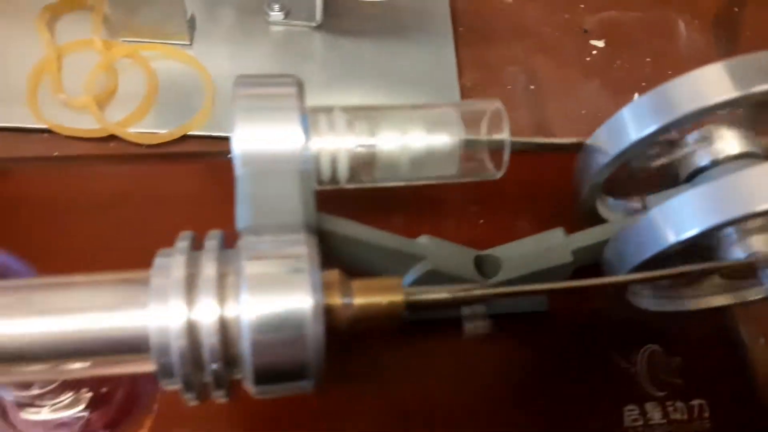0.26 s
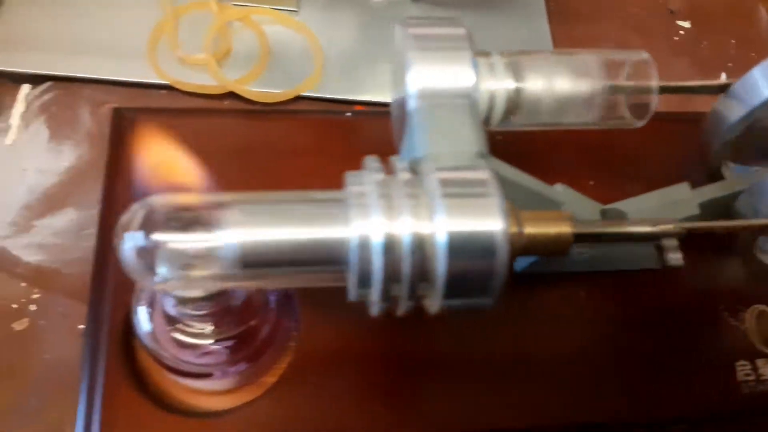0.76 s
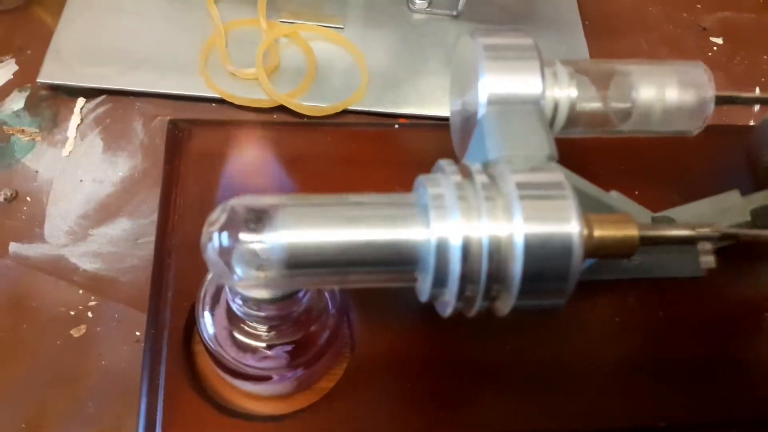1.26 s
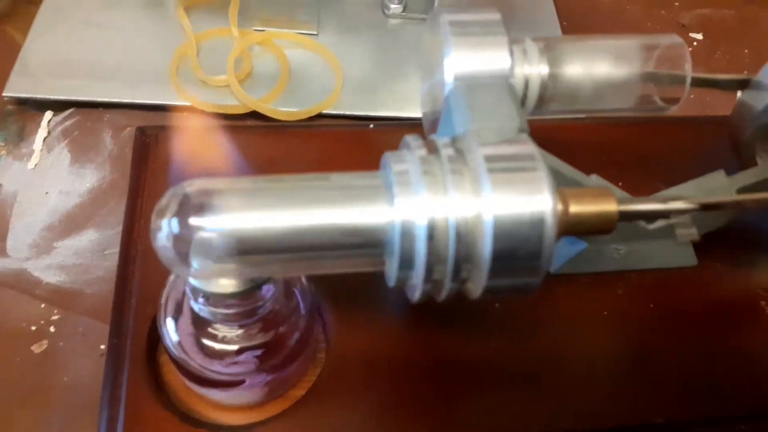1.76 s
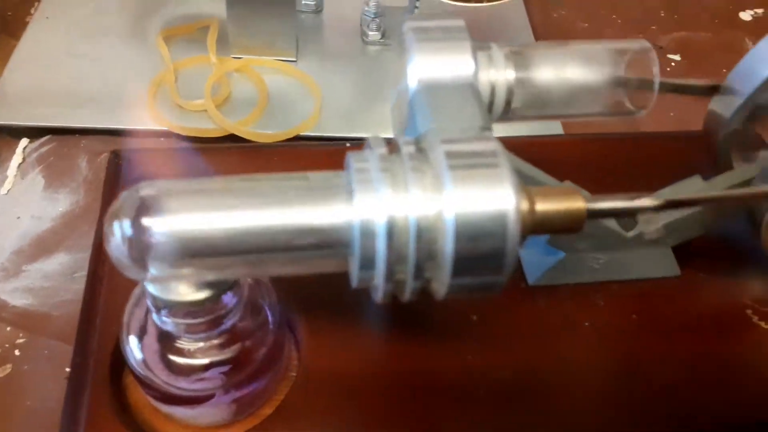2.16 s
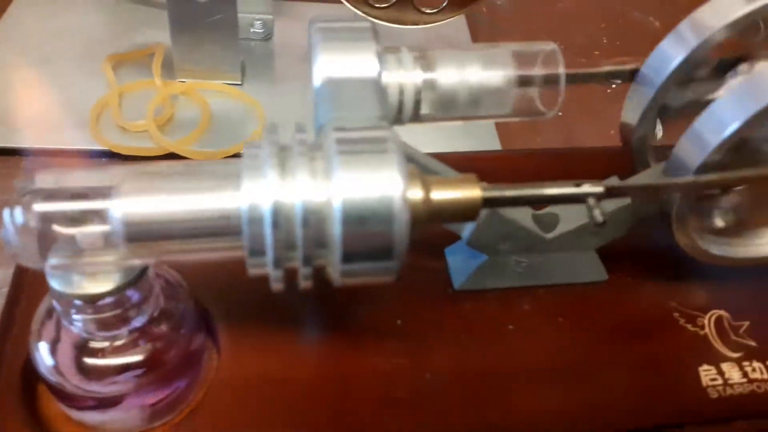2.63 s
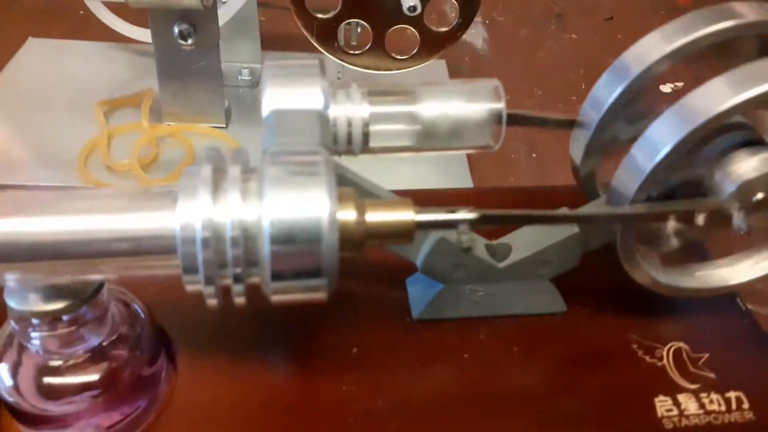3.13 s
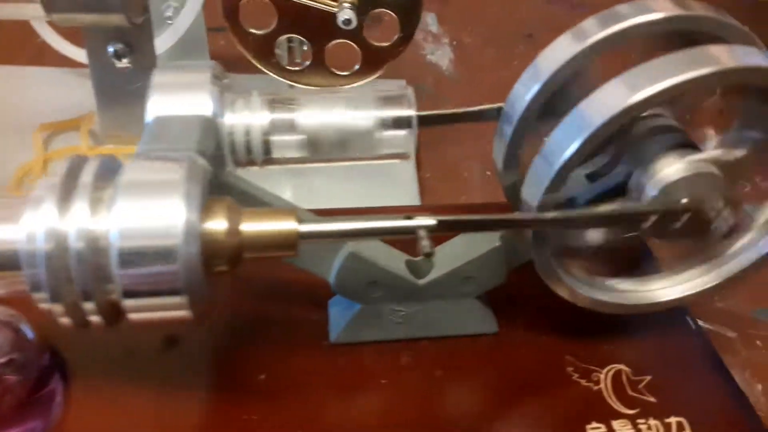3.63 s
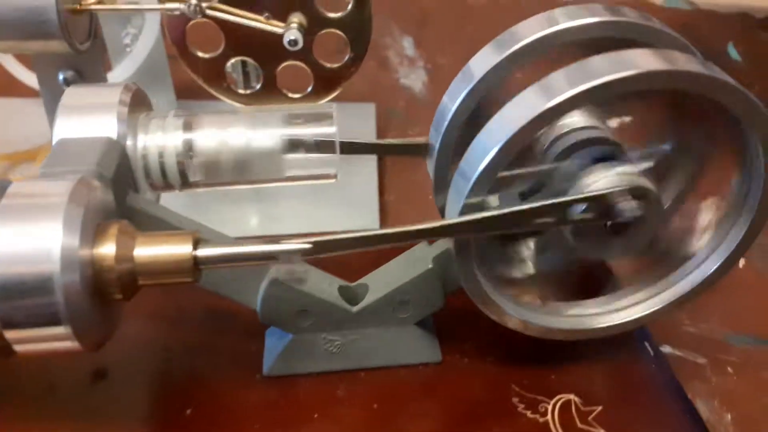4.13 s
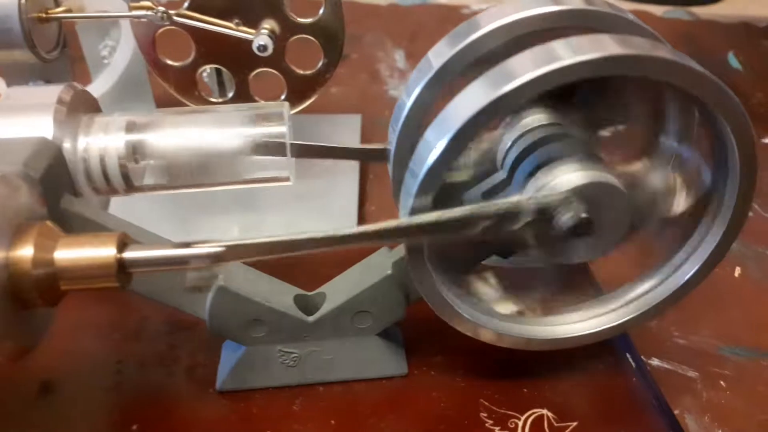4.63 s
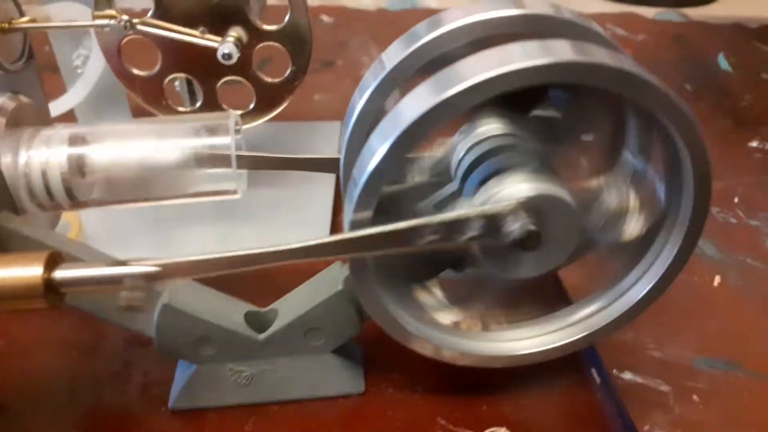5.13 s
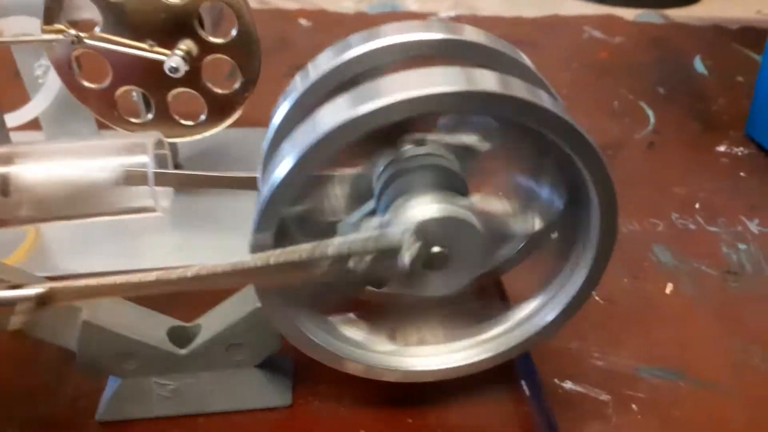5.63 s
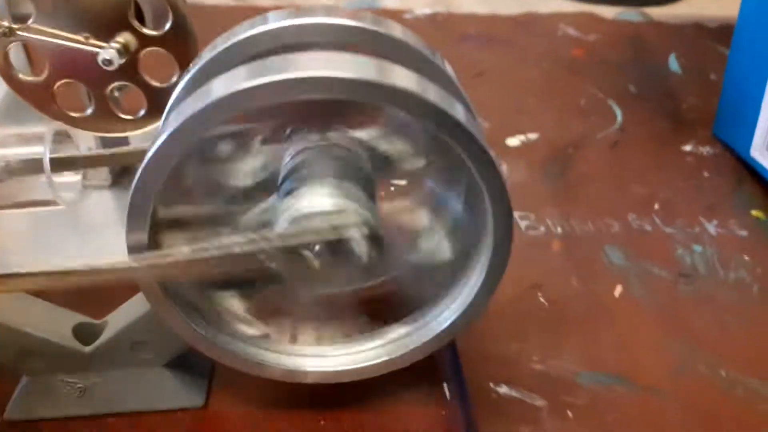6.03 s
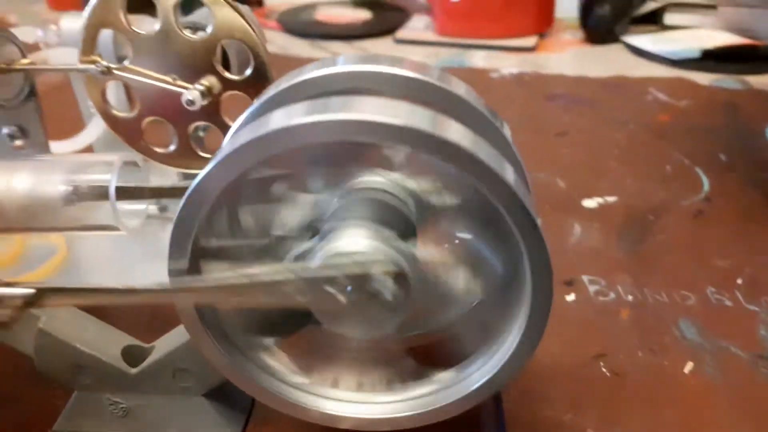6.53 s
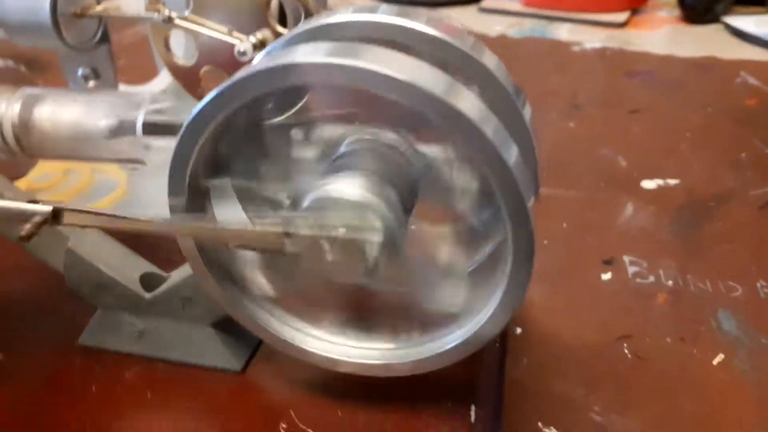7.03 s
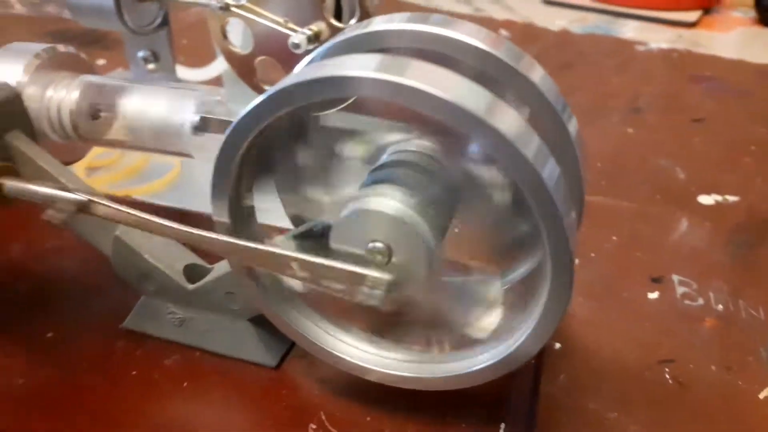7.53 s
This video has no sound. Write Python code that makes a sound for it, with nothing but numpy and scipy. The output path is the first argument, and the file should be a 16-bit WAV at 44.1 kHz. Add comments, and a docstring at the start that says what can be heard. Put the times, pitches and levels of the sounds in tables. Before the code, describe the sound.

A small model hot air engine runs on a wooden base with a fast, even clatter. Its loose linkage knocks and chatters twice each turn, mixing bright metal ticks with duller clacks and a hollow wooden hum. Soft thumps sit underneath at first. About halfway through, the engine starts gathering speed and the clatter shifts left. It is heard through a close, hand-held stereo microphone in a small, quiet room.

```python
"""A model hot-air engine on a wooden base in a small room, close up on a hand-held microphone pair.
It starts at about 4.5 turns a second, with soft thumps underneath. Twice a turn the load reverses: the
slack linkage knocks, rebounds and chatters, ringing metal, rods and base over the rumble of the bearings.
The pair drifts from the burner end to the flywheels, so the clatter, central at 2 s, is well to the left
by 4 s. From there the engine gathers speed, ending at nearly 7 turns a second."""
import sys
import numpy as np
from scipy import signal
from scipy.fft import rfft, irfft
from scipy.io import wavfile
from scipy.ndimage import uniform_filter1d, map_coordinates

SR = 44100
rng = np.random.default_rng(int(sys.argv[2]) if len(sys.argv) > 2 else 0)


def wrap_up_sound(samples):
    """Save the sound to the file named by the first command line argument, as 16-bit audio."""
    columns = np.atleast_2d(samples).T
    # keep every value between -1 and 1, then stretch to whole-number steps
    tamed = np.clip(columns, -1, 1)
    steps = np.round(tamed * 32767).astype(np.int16)
    wavfile.write(sys.argv[1], SR, steps)


N = 343084
T = np.arange(N) / SR
RING_T = T[:SR // 2]

# speed of the flywheels (t/s, speed/turns a second)
SPEED = [(0.0, 4.629), (0.4, 4.596), (0.55, 4.379), (0.83, 4.77), (1.19, 4.699), (1.8, 4.904), (3.28, 5.06),
         (3.77, 5.246), (4.68, 6.066), (5.1, 6.029), (5.56, 5.845), (6.09, 5.822), (6.62, 6.058),
         (7.78, 6.84)]
# contacts that follow the knock of a push and of a pull (delay/s, level/dB, timing scatter/s)
PUSH_CHATTER = [(.006, -10, 0.0012), (.0115, -7.5, 0.00083), (.0205, -14.5, 0.0011), (.0265, -11.5, 0.0019),
                (.030, -6, 0.0018), (.035, -11.5, .003)]
PULL_CHATTER = [(.010, -12, .002), (.014, -11, .002), (.019, -11, .002), (.024, -13, .002),
                (.0337, 3, .001), (.036, -8, .0015), (.040, -15, .002)]
# how close the microphone is to the flywheel end (t/s, level/dB)
WHEEL_NEAR = [(0, -1.5), (1.5, -5), (3, -3.5), (4, 0.5), (4.8, 0), (6, -0.5), (7, 4.5), (7.78, 2)]
# low, well damped resonances of the base on the table (f/Hz, width/Hz, level/dB)
THUMP_MODES = [(110, 24, -1), (177, 32, -4.5), (234, 250, 5)]


def engine():
    """The engine from close by: every stroke sounds in the bright metal, the rods and frame, and the base."""
    # the engine's side as the microphone moves (t/s, left minus right/dB)
    side = [(0, 6.5), (.7, 4), (1.95, -1), (3.5, 4.5), (3.9, 9.5), (5.1, 11.5), (6.65, 8), (7.15, 12),
            (7.6, 6.5)]
    # ring of a flywheel (f/Hz, width/Hz, level/dB)
    wheel_modes = [(1998, 8, -3)]
    # long rings of small steel parts (f/Hz, width/Hz, level/dB)
    steel_modes = [(14890, 15, -2), (15013, 14, 0), (15121, 14, 1), (15235, 18, -5)]
    times, knock_db, rod_db, frame_db, chatter_db, base_db = strokes()
    rebounds = rebound_times(times)
    near_db = on_time(WHEEL_NEAR, times)
    ticks = metal_ticks(times, rebounds, knock_db, chatter_db)
    clacks = rod_and_frame_clacks(times, rebounds, rod_db, frame_db, base_db)
    wood = base_knocks(times, rebounds, base_db, near_db)
    hum = base_hum(times + .025, .74 * near_db + 1.17 * base_db - 10)
    wheel = rings(times, .7 * near_db + base_db - 11, wheel_modes, scatter_db=1.5, detune=.002)
    sizzle = rings(times, .4 * near_db - 18, steel_modes, scatter_db=2.5, detune=.0012)
    pan_db = on_time(side, T)
    lag = 1.8 * uniform_filter1d(pan_db, SR)  # samples by which the left microphone leads
    return (place(ticks, pan_db, lag, room_db=-12.5)
            + place(clacks + wheel, 4.5 + .32 * pan_db, lag, room_db=-8)
            + place(wood, .58 + .29 * pan_db, 3 + .5 * lag, room_db=-11.5)
            + hum
            + place(sizzle, .5 * pan_db, lag, room_db=6))


def strokes():
    """Time of every stroke and the levels of its knock, rod clack, frame, chatter and wooden base."""
    # how hard each part sounds (push/dB, pull/dB, push and pull gain/dB per extra turn a second, scatter/dB)
    knock_force = (3, 5, 4.5, 1.7, 0.6)
    rod_force = (-2.35, -13.5, -0.5, -3, 0.9)
    frame_force = (-5.5, -7.8, 0.2, -1.0, 0.98)
    chatter_force = (7.5, 7, 1.5, -1.5, 2.4)
    base_force = (-4.5, -8, 3, 1.1, 1.8)
    # a few strokes slam home harder (t/s, extra level/dB)
    slams = [(.171, 3.5), (.389, 3), (.501, 6), (.724, 5), (4.042, 2.5), (4.565, 1), (5.397, 3),
             (6.994, 1.5), (7.151, 3)]
    # how close the microphone is to the bright pins and pistons (t/s, level/dB)
    metal_near = [(0, -8), (.9, -5), (2.0, -7), (2.8, -4.5), (3.5, 0.5), (4.05, 0), (5.2, -2), (5.9, -2.5),
                  (7.0, -4), (7.78, -7.5)]
    # rise and fall of the rods' clack (t/s, level/dB)
    rod_level = [(0, -19), (.55, 4), (1.15, -6.5), (1.45, -24), (2.3, -7), (3.1, 2), (4.6, 1), (6.0, -6),
                 (7.78, -5)]
    times, faster = reversals()
    metal_db = on_time(metal_near, times)
    slam_db = np.zeros(len(times))
    for s, db in slams:
        slam_db[np.argmin(np.abs(times - s))] = db
    return (times, force_db(knock_force, faster) + metal_db + slam_db,
            force_db(rod_force, faster) + on_time(rod_level, times),
            force_db(frame_force, faster),
            force_db(chatter_force, faster) + metal_db,
            force_db(base_force, faster))


def crank(first_push_s=.0657):
    """Turns of the shaft since the first push."""
    turns = np.cumsum(on_time(SPEED, T)) / SR
    return turns - np.interp(first_push_s, T, turns)


def reversals():
    """Times at which the load reverses, push and pull in turn, and the speed above 5 turns a second."""
    turns = crank()
    k = np.arange(int(2 * turns[-1]) + 1)
    faster = on_time(SPEED, np.interp(k / 2, turns, T)) - 5
    pull_turns = .4886 - .0043 * faster  # just under half a turn after the push, earlier at speed
    return np.interp(k // 2 + k % 2 * pull_turns, turns, T), faster


def force_db(rule, faster):
    """Push and pull each have their own strength, which follows the speed and varies from turn to turn."""
    push_db, pull_db, push_gain_db, pull_gain_db, scatter_db = rule
    is_pull = np.arange(len(faster)) % 2
    db = np.where(is_pull, pull_db + pull_gain_db * faster, push_db + push_gain_db * faster)
    return db + scatter_db * rng.standard_normal(len(faster))


def rebound_times(times):
    """When the slack linkage touches again after each knock."""
    rebounds = []
    for k, s in enumerate(times):
        delay, _, scatter = np.transpose(PULL_CHATTER if k % 2 else PUSH_CHATTER)
        rebounds.append(s + delay + scatter * rng.standard_normal(len(delay)))
    return rebounds


def chatter(rebounds, levels_db, scatter_db):
    """Times and levels of the rebounds: push and pull each repeat their own pattern, never quite alike."""
    rebounds_db = []
    for k, db in enumerate(levels_db):
        _, share_db, _ = np.transpose(PULL_CHATTER if k % 2 else PUSH_CHATTER)
        sizes = unit(undb(share_db + scatter_db * rng.standard_normal(len(share_db))))
        rebounds_db.append(db + 20 * np.log10(sizes))
    return np.concatenate(rebounds), np.concatenate(rebounds_db)


def metal_ticks(times, rebounds, knock_db, chatter_db):
    """The push closes the joints with a crunch, the pull with one sharp tick; both chatter and scrape."""
    # resonances of pins, pistons and glass (f/Hz, width/Hz, level/dB)
    metal_modes = [(6600, 690, -39), (8325, 560, -4), (9850, 490, 1), (10540, 1600, -6.5),
                   (12770, 1000, 6.5), (12700, 950, -8)]
    metal = body(metal_modes)
    pushes = knocks(times[::2], knock_db[::2] + .5, metal, decay_s=.0013, grain_db=.5, apart_db=13.5)
    pulls = knocks(times[1::2], knock_db[1::2], metal, decay_s=.0008, grain_db=-1, apart_db=-9.5)
    bounces = chatter(rebounds, chatter_db - 7.5, scatter_db=4)
    rattle = knocks(*bounces, metal, decay_s=.0007, grain_db=4.5, apart_db=22)
    return pushes + pulls + rattle + scrape(times, chatter_db - 15.5, metal, length_s=.04, grain_db=6)


def rod_and_frame_clacks(times, rebounds, rod_db, frame_db, base_db):
    """Each knock rings the rods and the frame; the frame also carries the rebounds and the sliding."""
    # resonances of the connecting rods (f/Hz, width/Hz, level/dB)
    rod_modes = [(2660, 220, -15.5), (2762, 94, -13), (3000, 100, -35)]
    # broad, dull resonances of the frame (f/Hz, width/Hz, level/dB)
    frame_modes = [(966, 157, 3.5), (1276, 190, -2.5), (1570, 117, 4), (2034, 280, -3), (2830, 700, -3.5),
                   (4960, 440, -7.5), (5690, 490, -6.5), (6220, 870, -7)]
    frame = body(frame_modes)
    clacks = knocks(times, rod_db - 2, body(rod_modes), decay_s=.001666, grain_db=3, apart_db=6)
    clacks += knocks(times, frame_db + .091, frame, decay_s=.002444, grain_db=2.5, apart_db=4.5)
    bounces = chatter(rebounds, base_db / 2 - 9, scatter_db=6.5)
    rattle = knocks(*bounces, frame, decay_s=.0015, grain_db=3, apart_db=2.5)
    return clacks + rattle + scrape(times, base_db / 2 - 16.5, frame, length_s=.049, grain_db=3.5)


def base_knocks(times, rebounds, base_db, near_db):
    """Knocks and rebounds sound in the wood; the push also rocks the base on the table."""
    # resonances of the wooden base and the table under it (f/Hz, width/Hz, level/dB)
    base_modes = [(185, 19, -12.5), (300, 76, -11.5), (520, 16, -6), (590, 66, 2), (700, 72, 4.5),
                  (779, 48, 1.5), (880, 25, 0), (1134.5, 100, -11)]
    base = body(base_modes)
    wood = knocks(times, base_db - 8, base, decay_s=.00176, grain_db=7.5, apart_db=-10.5)
    bounces = chatter(rebounds, base_db - 5, scatter_db=0)
    rattle = knocks(*bounces, base, decay_s=.0016, grain_db=3.5, apart_db=-16)
    rock_db = base_db[::2] + near_db[::2] - 18.5
    rocking = knocks(times[::2], rock_db, body(THUMP_MODES), decay_s=.0023, grain_db=5.5, apart_db=-5.5)
    return wood + rattle + rocking


def knocks(times, levels_db, response, decay_s, grain_db, apart_db):
    """A loose joint closes in a burst of tiny uneven impacts; each microphone also catches its own share."""
    track = np.zeros((2, N))
    t = T[:SR // 70]
    for s, db in zip(times, levels_db):
        force, size = rng.standard_normal((2, 3, len(t)))
        shared, left, right = force * undb(grain_db * size[0]) * np.sqrt(t) * np.exp(-t / decay_s)
        burst = shared + undb(apart_db) * np.array([left, right])
        contact = np.sqrt(2) * unit(signal.fftconvolve(burst, response[None, :SR // 12], axes=1))
        add(track, s - decay_s / 2, undb(db) * contact)
    return track


def scrape(times, levels_db, response, length_s, grain_db):
    """Gritty sliding of pins and pistons while they are under load after each reversal."""
    load = np.zeros(N)
    swell = unit(np.sin(np.pi * np.minimum(RING_T / length_s, 1)))
    for s, db in zip(times, levels_db):
        add(load, s, undb(db) * swell)
    grains = undb(grain_db * rng.standard_normal(N // 16 + 1)).repeat(16)[:N]
    grit = grains * rng.standard_normal((2, N))
    return np.array([convolve(load * channel / grit.std(), response) for channel in grit])


def rings(times, levels_db, modes, scatter_db, detune):
    """Lightly damped modes ring on into the next stroke; the parts' motion shifts their pitch slightly."""
    track = np.zeros((2, N))
    attack = 1 - np.exp(-RING_T / .0087)
    for hz, width, mode_db in modes:
        envelope = np.sqrt(2) * unit(np.exp(-np.pi * width * RING_T)) * attack
        for s, db, (phase, size, bend) in zip(times, levels_db, rng.standard_normal((len(times), 3))):
            tone = np.cos(2 * np.pi * (hz * (1 + detune * bend) * RING_T + phase))
            add(track, s, undb(db + mode_db + scatter_db * size) * envelope * tone)
    return track


def base_hum(times, levels_db):
    """Set off by the rebounds, the hollow base hums on between strokes, right beside both microphones."""
    # resonance of the hollow base (f/Hz, width/Hz, level/dB)
    hollow_modes = [(338, 16, 0)]
    hum = rings(times, levels_db, hollow_modes, scatter_db=.9, detune=.0028)
    return place(hum, pan_db=-1, lag=0, room_db=-10)


def bearing_rumble(db, swing_db):
    """The shaft rumbles in its bearings, hardest just after each reversal of the load."""
    # spectrum of the bearings (f/Hz, relative level/dB)
    spectrum = [(25, -37), (45, -11), (70, -16), (130, -6.5), (200, -7), (300, 2), (430, -10), (750, 3),
                (2000, -22), (6000, -21.5), (15000, -35)]
    load = np.cos(2 * np.pi * (2 * crank() - .25))
    return undb(db + on_time(WHEEL_NEAR, T) + swing_db * load) * noise(spectrum)


def thumps():
    """Dull thumps under the clatter, left of centre: a slow push into low, well damped resonances."""
    # soft low thumps (t/s, level/dB)
    events = [(0.656, -21), (0.877, -19.5), (1.086, -18.5), (1.283, -20.5), (1.47, -25), (1.638, -21),
              (1.828, -21), (2.72, -23.5), (5.652, -14), (6.048, -20)]
    track = np.zeros((2, N))
    thump = unit(signal.fftconvolve(np.hanning(SR // 200), body(THUMP_MODES)))
    for s, db in events:
        add(track, s, undb(db) * thump)
    return place(track, pan_db=6.8, lag=0, room_db=-19)


def room_tone(db):
    """Faint steady background of the room."""
    # spectrum of the room's air (f/Hz, relative level/dB)
    spectrum = [(25, -18), (60, -47), (130, -21), (350, 15), (800, -33), (2000, -3.5), (6000, -17),
                (15000, -4)]
    return undb(db) * noise(spectrum)


def room_tail():
    """Diffuse decay of the small room, longest in the bass."""
    # reverberation time (f/Hz, time to fall 60 dB/s)
    t60 = [(150, 1), (800, 0.14), (3000, 0.14), (8000, 0.2), (14000, 0.14)]
    hz = np.fft.rfftfreq(len(RING_T), 1 / SR)
    white = rfft(rng.standard_normal(len(RING_T)))
    edges_hz = [0, 300, 1000, 3000, 9000, SR / 2]
    tail = np.zeros(len(RING_T))
    for low, high in zip(edges_hz, edges_hz[1:]):
        band = irfft(white * (hz >= low) * (hz < high), len(RING_T))
        tail += band * undb(-60 * RING_T / on_log_hz(t60, (low + high) / 2))
    return unit(tail * (1 - np.exp(-RING_T / .0007)))


def place(pair, pan_db, lag, room_db):
    """Direct sound reaches the left microphone pan_db louder and lag samples sooner; the room follows."""
    channels = []
    for x, side in zip(pair, (1, -1)):
        direct = map_coordinates(x, [np.arange(N) + side * lag / 2], order=5)
        gain = np.sqrt(2 / (1 + undb(-2 * side * pan_db)))
        channels.append(gain * direct + np.sqrt(gain) * undb(room_db) * convolve(x, room_tail()))
    return np.array(channels)


def body(modes):
    """Causal impulse response of damped resonances whose powers add."""
    hz = np.fft.rfftfreq(len(RING_T), 1 / SR)
    power = sum(undb(2 * db) * (width * hz) ** 2 / ((width * hz) ** 2 + (hz ** 2 - centre ** 2) ** 2)
                for centre, width, db in modes)
    cepstrum = irfft(np.log(power + 1e-9), len(RING_T))
    cepstrum[len(RING_T) // 2:] = 0  # minimum phase: nothing rings before the hit
    return unit(irfft(np.exp(rfft(cepstrum)), len(RING_T)))


def noise(spectrum):
    """Steady coloured noise, partly shared by both microphones."""
    shared, left, right = rng.standard_normal((3, N))
    colour = undb(on_log_hz(spectrum, np.fft.rfftfreq(N, 1 / SR)))
    pair = irfft(rfft(shared + np.array([left, right])) * colour, N)
    return pair / pair.std()


def undb(db):
    """Decibels to gain."""
    return 10 ** (np.asarray(db) / 20)


def unit(x):
    """Scale to an energy of one."""
    return x / np.sqrt(np.sum(x ** 2))


def convolve(x, response):
    """Pass a sound through an impulse response."""
    return signal.fftconvolve(x, response)[:N]


def add(track, s, sound):
    """Mix a short sound into a track at s seconds."""
    start = int(np.clip(s * SR, 0, N))
    track[..., start:start + sound.shape[-1]] += sound[..., :N - start]


def on_time(points, times):
    """Read (t/s, value) points at the given times."""
    return np.interp(times, *np.transpose(points))


def on_log_hz(points, hz):
    """Read (f/Hz, value) points on a logarithmic frequency axis."""
    f, value = np.transpose(points)
    return np.interp(np.log(hz + 1), np.log(f), value)


def scene():
    """The engine close to the microphones, the quiet room behind it."""
    return engine() + bearing_rumble(db=-50.5, swing_db=5.5) + thumps() + room_tone(db=-58)


def record(dry):
    """The recorder thins the deep bass, clips at full scale and cuts the top."""
    low_cut = signal.butter(2, 55, "high", fs=SR, output="sos")
    top_cut = signal.ellip(8, .2, 70, 15600, fs=SR, output="sos")
    clipped = np.clip(signal.sosfilt(low_cut, dry), -1, 1)
    return signal.sosfilt(top_cut, clipped)


dry = scene()
out = record(dry)
wrap_up_sound(out)
```